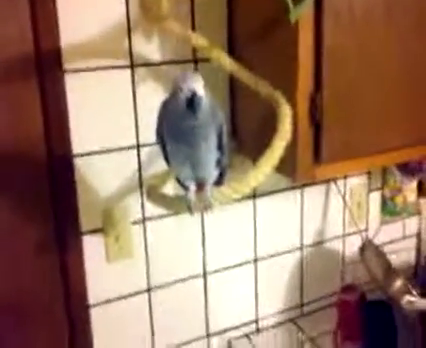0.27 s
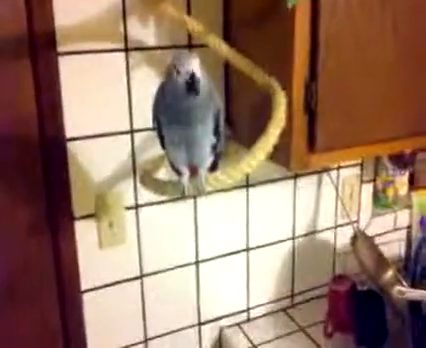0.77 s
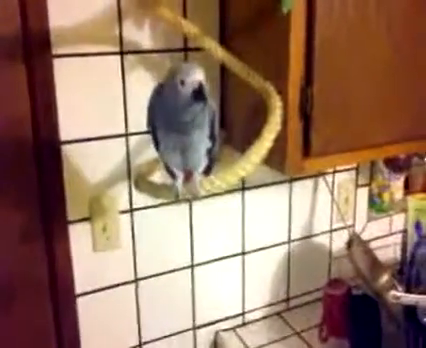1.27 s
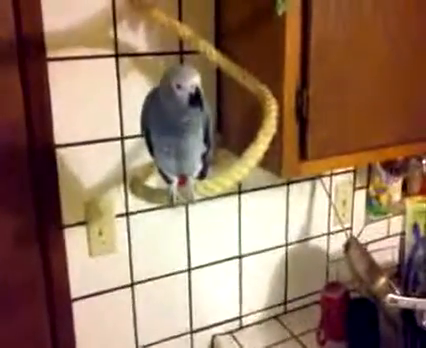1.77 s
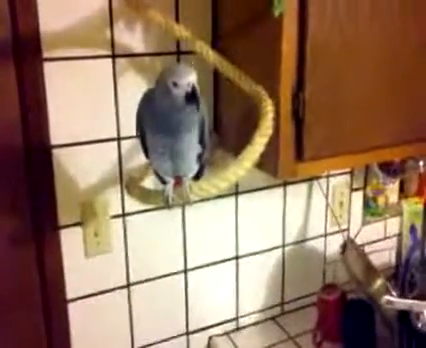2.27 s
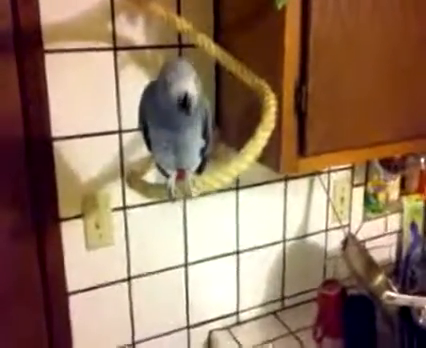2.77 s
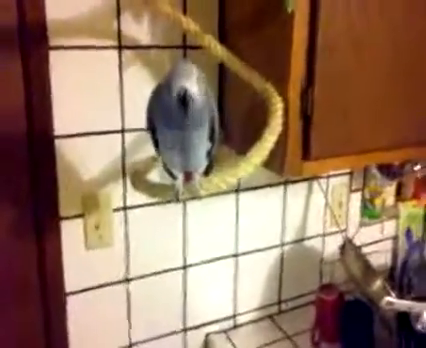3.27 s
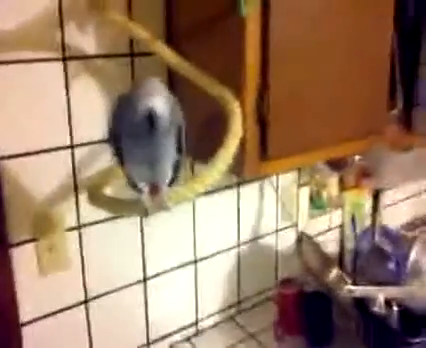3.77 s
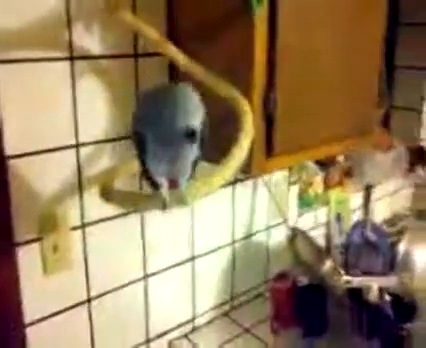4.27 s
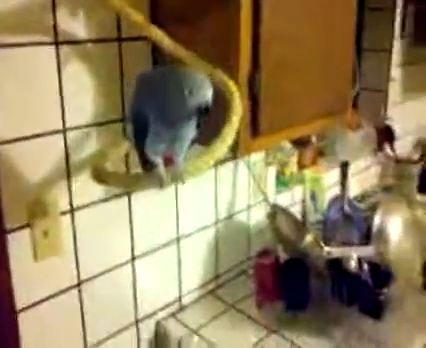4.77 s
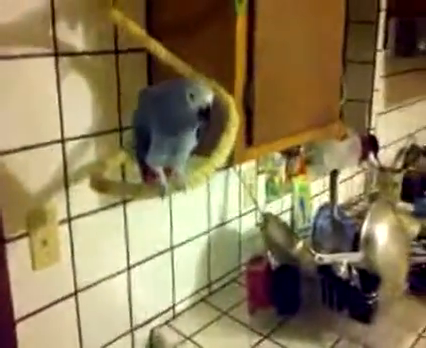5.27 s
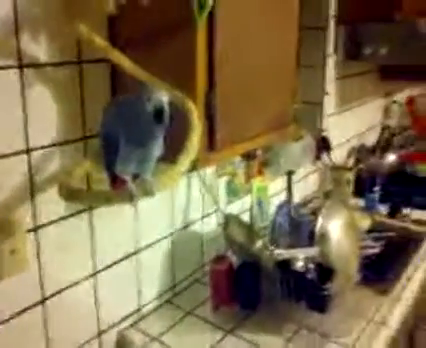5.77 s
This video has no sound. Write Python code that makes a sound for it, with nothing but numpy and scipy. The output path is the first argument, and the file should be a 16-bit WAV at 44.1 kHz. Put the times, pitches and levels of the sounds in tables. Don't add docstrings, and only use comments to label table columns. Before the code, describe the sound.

A parrot clicks its tongue sharply in steady, evenly spaced runs in an echoing tiled kitchen, over a low appliance hum and soft hiss.

```python
import sys
import numpy as np
from scipy import signal
from scipy.fft import rfft, irfft, next_fast_len
from scipy.io import wavfile
from scipy.ndimage import uniform_filter1d

SR = 44100
rng = np.random.default_rng(int(sys.argv[2]) if len(sys.argv) > 2 else 0)


def rack_gain(trim_db):
    fader = np.asarray(trim_db, float)
    return 10 ** (fader / 20)


def log_audio(samples):
    frames = np.atleast_2d(samples).T
    limited = np.clip(frames, -1, 1)
    pcm = np.round(limited * 32767).astype(np.int16)
    wavfile.write(sys.argv[1], SR, pcm)


N = 264820


def evened(x):
    return x / np.sqrt(np.mean(x ** 2) + 1e-20)


def read(points, hz):
    f, value = np.transpose(points)
    return np.interp(np.log(hz + 1), np.log(f + 1), value)


def resonate(x, hz, width):
    turn = np.exp(2j * np.pi * hz * np.arange(x.shape[-1]) / SR)
    r = np.exp(-np.pi * width / SR)
    smooth = signal.lfilter([(1 - r) ** 2], [1, -2 * r, r * r], x / turn)
    return 2 * (turn * smooth).real


# frequency in Hz, level in dB per Hz against the chest's own level.
CHEST_COLOUR = [(280, -25.5), (430, -7.5), (560, -2.5)]
# frequency in Hz, level in dB per Hz against the throat's own level.
THROAT_COLOUR = [(740, -0.5), (950, -1.5), (1200, 2)]
# frequency in Hz, level in dB per Hz against the rasp's own level.
RASP_COLOUR = [(3400, 0.5), (4500, -10), (6200, -10)]
# frequency in Hz, level in dB per Hz against the snap's own level.
SNAP_COLOUR = [(7900, -9.5), (9000, -7), (10400, -3.5), (12000, -6.5)]


def tongue(cavity_hz, throat_db, rasp_db, snap_db, chest_db):
    flank_db = -5 + 0.45 * (rasp_db + 12)
    cavity = [(0.87 * cavity_hz, flank_db), (cavity_hz, 0), (1.56 * cavity_hz, flank_db)]
    parts = ((CHEST_COLOUR, throat_db + chest_db), (THROAT_COLOUR, throat_db), (cavity, 0),
             (RASP_COLOUR, rasp_db), (SNAP_COLOUR, snap_db))
    colour = [(f, d + part_db) for points, part_db in parts for f, d in points]
    log_gain = np.log(rack_gain(read(colour, abs(np.fft.fftfreq(2048, 1 / SR)))))
    ring = np.fft.ifft(np.exp(signal.hilbert(log_gain).conj())).real[:1024]
    slips = np.zeros(50)
    slips[rng.integers(8, 50, size=3)] = 0.17 * rng.standard_normal(size=3)
    slips[0] = 1
    return np.convolve(ring, slips)


# frequency in Hz, time in seconds for the echo to fall by 60 dB.
RING_TIME = [(400, .4), (800, .45), (1500, .5), (2500, 0.44), (4000, 0.57), (7000, 0.39), (11000, 0.35)]


def kitchen(direct_db, near_db=8, near_s=0.049, lumps_db=3, rise_s=.004, direct_s=.005,
            treble_share=.5, direct_width=.75, treble_hz=3300):
    size = SR * 7 // 10
    t = np.arange(size) / SR

    taps = np.zeros((2, size))
    at = np.arange(0, size - 20, 20) + rng.integers(0, 20, (2, (size - 1) // 20))
    np.put_along_axis(taps, at, rng.choice([-1., 1.], at.shape), 1)
    lumps = np.minimum(rng.exponential(1, taps.shape), 3)
    taps *= rack_gain(lumps_db * lumps * np.exp(-t / 0.18))

    hz, frames, z = signal.stft(taps, SR, nperseg=256)
    fade = rack_gain(-60 * frames / read(RING_TIME, hz)[:, None])
    tail = signal.istft(z * fade, SR, nperseg=256)[1][:, :size]
    near_tiles = 1 + rack_gain(near_db) * np.exp(-t / near_s)
    tail *= near_tiles * np.clip(t / rise_s, .38, 1) ** 3
    tail[:, 150] += rack_gain(4)

    direct = 1.15 * direct_db * np.exp(-((t / direct_s - 1) / direct_width) ** 2)
    low = signal.sosfiltfilt(signal.butter(2, treble_hz, fs=SR, output="sos"), tail)
    bass = signal.sosfiltfilt(signal.butter(2, 850, fs=SR, output="sos"), tail)
    bass_db = 3.5 - 8 * np.exp(-t / .009)
    treble_db = treble_share * direct + 2.5 - 2.2 * np.exp(-t / .012)
    return (low - bass) * rack_gain(direct) + bass * rack_gain(bass_db) + (tail - low) * rack_gain(treble_db)


# start in seconds, peak level in dB, beak cavity pitch in Hz,
# rasp in dB against the cavity, facing (direct sound over the echoes) in dB.
CLICKS = [(0.2202, -9.5, 1902, -11.5, 2.5), (0.5138, -7.5, 1889, -9.5, 3.5), (0.8155, -7, 1840, -8.5, 1),
          (1.1275, -9.5, 1910, -9.5, 2.5), (1.454, -8, 1850, -10, 2), (2.5068, -8.5, 2070, -18, 5),
          (2.8095, -9, 1820, -26, 11), (3.087, -11.5, 1940, -5, 8), (3.3853, -12.5, 2148, -16.5, 5),
          (3.6604, -14, 1966, -4, 3), (3.9504, -13.5, 1820, -5, 1), (4.2482, -9, 1972, -10.5, 5.5),
          (4.5424, -10, 1823, -6, 4), (4.8234, -8.5, 1762, -9, 3), (5.118, -7.5, 2010, -9.5, 3.5)]
# peak level in dB, beak cavity pitch in Hz,
# rasp in dB against the cavity, facing in dB.
EARLIER_CLICK = (-7.5, 1906, -8, 4)


def parrot():
    out = np.zeros((2, N + 2 * SR))
    for s, db, cavity_hz, rasp_db, direct_db in [(-.085, *EARLIER_CLICK)] + list(CLICKS):
        effort, rasp, facing = db + 9, rasp_db + 10, direct_db - 4
        throat_db = -13.5 - 0.48 * effort + .2 * rasp - .5 * facing
        snap_db = -14 + .9 * rasp + .9 * facing - .5 * effort
        snap_db -= 20 * (cavity_hz / 1000 - 1.9)
        click = tongue(cavity_hz, throat_db, rasp_db, snap_db, chest_db=-11.5)
        heard = signal.fftconvolve(click[None], kitchen(direct_db), axes=1)
        late = heard[:, 600:]
        heard *= rack_gain(db - 14.4) / np.sqrt(np.mean(late ** 2, 1)[:, None] * 10)
        start = SR + round((s - .002) * SR)
        out[:, start:start + heard.shape[1]] += heard
    return out[:, SR:SR + N]


# frequency in Hz, level in dB per Hz.
ROOM_TONE = [(30, -10), (110, -8.5), (330, -5.5), (520, -10), (1000, -21.5), (1250, -23), (2000, -40)]
# frequency in Hz, level in dB per Hz.
HISS = [(600, -45), (1250, -25.5), (2500, -16), (4000, -24.5), (5600, -27), (6500, -22.5), (10000, -19.5),
        (11000, -19.5)]
# frequency in Hz, width in Hz, level in dB.
HUM = [(169.3, 14, -67), (203.7, 11, -61.5), (227.4, 26, -61)]
# time in seconds, gain in dB.
NEARNESS = [
    (0, 3.5),
    (1, 0.5),
    (1.7, 2.5),
    (2.4, 1.5),
    (3, -2.5),
    (4, -2),
    (5.6, -1.5),
    (5.8, 1.5),
    (6, 0.5),
]


def background():
    frames, hz, t = N // 256 + 5, np.fft.rfftfreq(1024, 1 / SR), np.arange(N) / SR
    a, b, patches = rng.standard_normal((3, 2, 513, frames))
    patches = evened(uniform_filter1d(uniform_filter1d(patches[0], 10, 0), 12, 1))
    colour = np.hypot(rack_gain(read(ROOM_TONE, hz)), rack_gain(read(HISS, hz)))[:, None]
    z = (a + 1j * b) * colour * rack_gain(2.5 * patches)
    hiss = rack_gain(-58) * evened(signal.istft(z, nperseg=1024, noverlap=768)[1][:, :N])

    near_db = np.interp(t, *np.transpose(NEARNESS))
    noise = rng.standard_normal((2, N))
    waver_db = 2.5 * evened(resonate(rng.standard_normal(N), 0, 9))
    hum = sum(rack_gain(db) * evened(resonate(noise, f, width)) for f, width, db in HUM)
    flow = evened(resonate(noise, 950, 390) + 1.5 * resonate(noise, 532, 180))
    flow_db = -67 + 1.6 * near_db
    whine = evened(resonate(noise, 1530, 400))
    whine_idle_db, whine_full_db, whine_start_s, whine_rise_s = -79.5, -65.5, 5.62, .18
    rise = np.clip((t - whine_start_s) / whine_rise_s, 0, 1)
    whine_db = whine_idle_db + (whine_full_db - whine_idle_db) * rise
    return hiss + rack_gain(near_db + waver_db) * hum + rack_gain(flow_db) * flow + rack_gain(whine_db) * whine


# frequency in Hz, dB under the loudest band.
MASKED = [(100, -33), (400, -30), (1000, -30), (3000, -37), (6000, -39.5), (7500, -27), (10000, -50.5)]


def drop_hidden_bands(pair, quiet_db=-104, weaker_db=-13, chance_db=3, soft_db=0.1):
    hz, _, z = signal.stft(pair, SR, "cosine", 1024, 512)
    bands = (abs(z[:, :512]) ** 2).reshape(2, 64, 8, -1).mean(2)
    level_db = 10 * np.log10(bands + 1e-20)
    masked_db = level_db.max((0, 1)) + read(MASKED, hz[4::8])[:, None]
    limit_db = np.maximum(np.maximum(masked_db, quiet_db), level_db[::-1] + weaker_db)
    margin_db = level_db - limit_db + chance_db * rng.standard_normal(bands.shape)
    z[:, :512] *= np.repeat(.5 + .5 * np.tanh(margin_db / soft_db), 8, 1)
    out = signal.istft(z, SR, "cosine", 1024, 512)[1][:, :N]
    before, after = (abs(uniform_filter1d((v ** 2).sum(0), 200)) + 1e-20 for v in (pair, out))
    return out * np.minimum(1, np.sqrt(before / after))


# frequency in Hz, step in dB under the recent loudest band.
STEP = [(300, -56), (1000, -52), (3000, -44), (4500, -35), (6000, -27), (8000, -25), (10000, -30)]
# frequency in Hz, step in dB against the band's own level.
OWN_STEP = [(1500, -14), (2600, -6), (3600, 4), (6000, 9), (10000, 7)]


def coarse_steps(pair, quiet_db=-99, release_db=3.0, attack_db=12, chance_db=4):
    hz, _, z = signal.stft(pair, SR, "cosine", 2048, 1024)
    band_db = 10 * np.log10(abs(uniform_filter1d(abs(z) ** 2, 24, 1)) + 1e-20)
    loud_db = band_db.max((0, 1))
    fall = release_db * np.arange(len(loud_db))
    held_db = np.maximum.accumulate(loud_db + fall) - fall
    chance = np.repeat(rng.standard_normal((2, 65, len(fall))), 16, 1)[:, :len(hz)]
    masked_db = np.maximum(held_db + read(STEP, hz)[:, None], quiet_db)
    busy_db = np.clip(held_db + 60, -10, 0)
    own_db = band_db.max(0) + read(OWN_STEP, hz)[:, None] + busy_db
    step_db = np.maximum(masked_db, own_db) + chance_db * chance
    rise_db = np.diff(loud_db, prepend=loud_db[0])
    attack = (rise_db > attack_db) | np.roll(rise_db > attack_db, 1)
    step = rack_gain(step_db - 22 * attack)
    z *= np.round(abs(z) / step) * step / (abs(z) + 1e-20)
    return signal.istft(z, SR, "cosine", 2048, 1024)[1][:, :N]


def hush_before_attacks(pair, ahead_s=.013, jump_db=27, hush_db=-9, above_hz=900):
    level_db = 10 * np.log10(abs(uniform_filter1d((pair ** 2).sum(0), 132)) + 1e-14)
    jump = np.roll(level_db, -round(ahead_s * SR)) - level_db > jump_db
    treble = signal.sosfiltfilt(signal.butter(2, above_hz, "high", fs=SR, output="sos"), pair)
    return pair - treble * (1 - rack_gain(hush_db)) * uniform_filter1d(1. * jump, 66)


def scene():
    return parrot() + background()


def top_cut(x):
    return signal.sosfilt(signal.butter(12, 12320, fs=SR, output="sos"), x)


# frequency in steps of 1575 Hz, lead in half turns.
LEAD = [(0, .75), (.14, .45), (.32, .2), (.7, .16), (1, 0), (1.46, .6), (2, 1), (8, -5)]
# frequency in Hz, share of the difference tied to the sum.
TIED = [(200, 0.96), (600, .2), (1600, 0.49), (2300, 1), (4000, 0.99), (6000, 0.98), (10000, 0.42)]
# frequency in Hz, level in dB.
STRAY = [(4800, -37), (6000, -12), (9500, -7)]
# frequency in Hz, level in dB.
LOUDER_LEFT = [(60, 1.5), (200, 3.5), (600, 3.5), (1200, 0.5), (1900, -2.5), (2500, -1), (3300, -0.5),
               (11000, 0)]


def record(dry):
    size = next_fast_len(N + 4096)
    hz, (first, second) = np.fft.rfftfreq(size, 1 / SR), rfft(dry, size)
    half_lead = np.pi / 2 * np.interp(hz / 1575, *np.transpose(LEAD))
    tied = np.clip(read(TIED, hz), 0, 1)
    total = np.cos(half_lead) * first + rack_gain(read(STRAY, hz)) * np.sin(half_lead) * second
    difference = -1j * np.sin(half_lead) * (tied * first + np.sqrt(1 - tied ** 2) * second)

    treble_edge = rack_gain(-np.clip((hz - 10918) * 0.088, 0, 70))
    edge = treble_edge * hz ** 4 / (hz ** 4 + 70 ** 4)
    louder_left = np.tanh(read(LOUDER_LEFT, hz) / 17)
    leaky = np.array([total + louder_left * difference, difference + louder_left * total])
    pair = irfft(leaky * edge, size)[:, :N]

    total, difference = hush_before_attacks(coarse_steps(drop_hidden_bands(pair)))
    ports = np.array([total + difference, total - difference])
    knee = np.maximum(abs(ports) - .7, 0)
    ports -= np.sign(ports) * (knee - .22 * np.tanh(knee / .22))
    ports = signal.sosfiltfilt(signal.butter(12, 11800, fs=SR, output="sos"), ports)
    return top_cut(ports)


dry = scene()
out = record(dry)
log_audio(out)
```